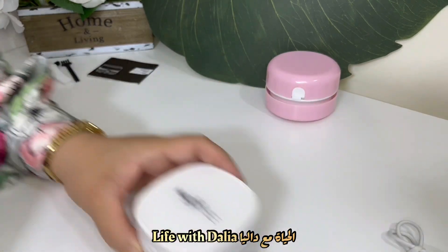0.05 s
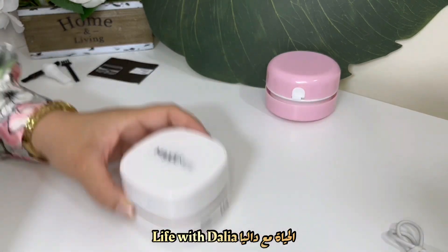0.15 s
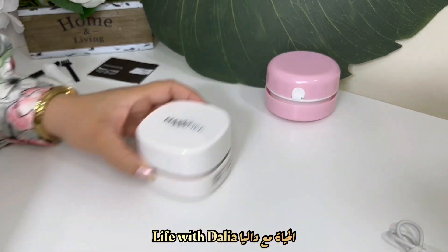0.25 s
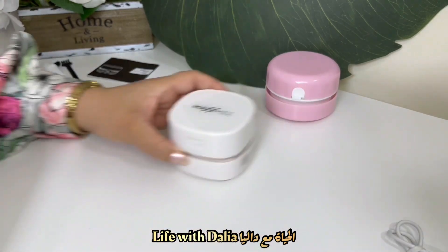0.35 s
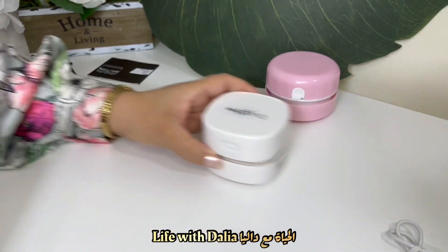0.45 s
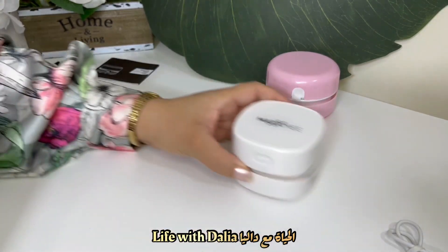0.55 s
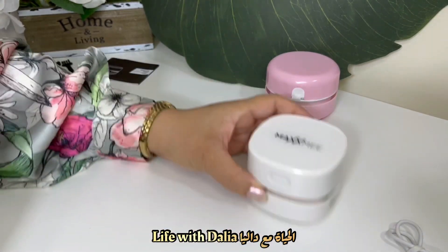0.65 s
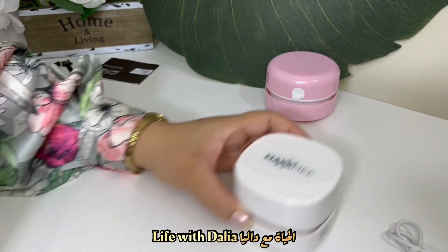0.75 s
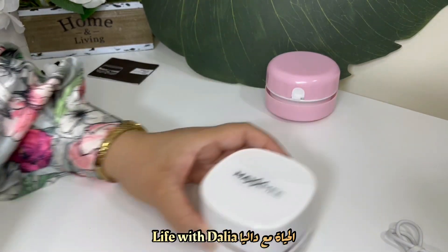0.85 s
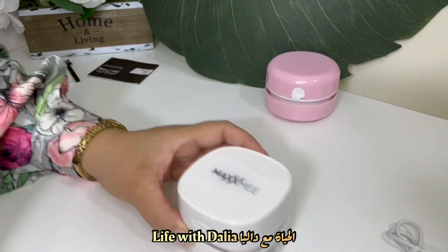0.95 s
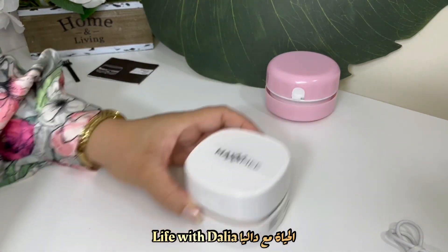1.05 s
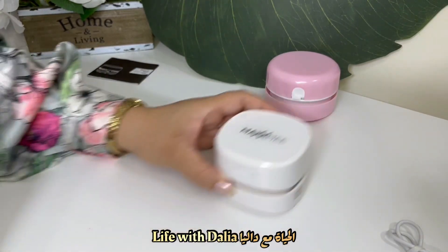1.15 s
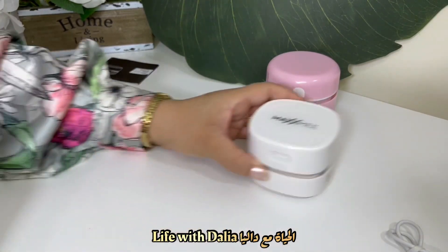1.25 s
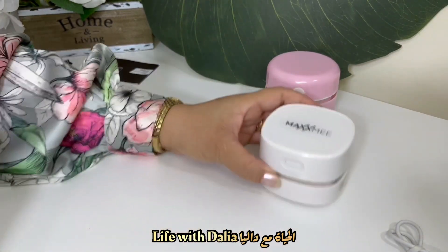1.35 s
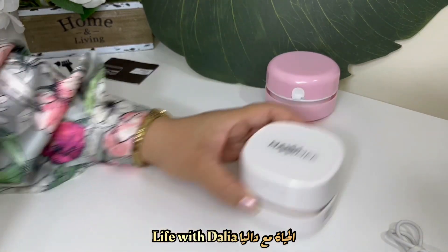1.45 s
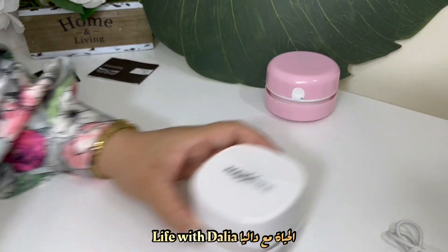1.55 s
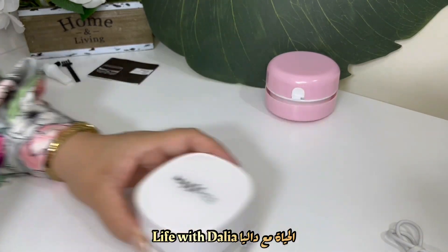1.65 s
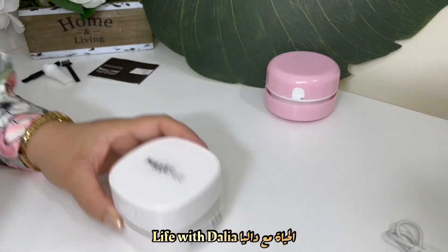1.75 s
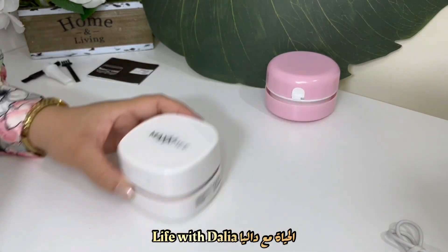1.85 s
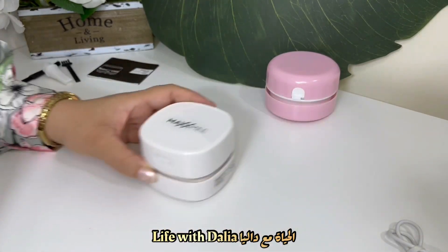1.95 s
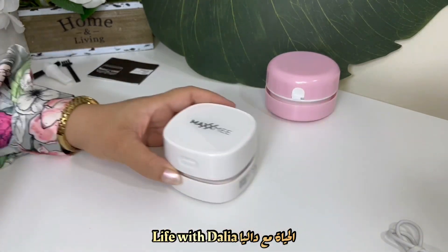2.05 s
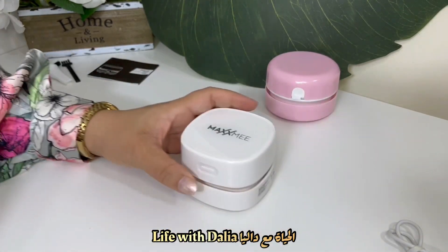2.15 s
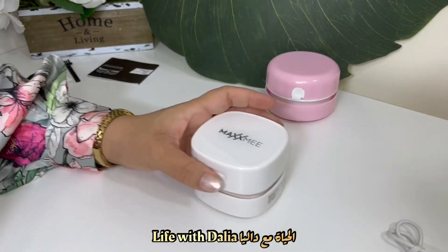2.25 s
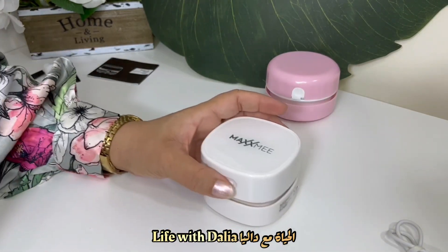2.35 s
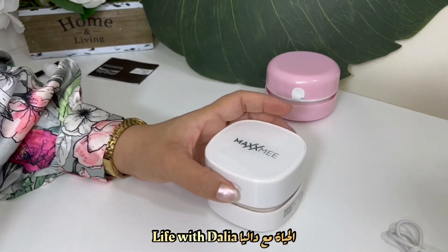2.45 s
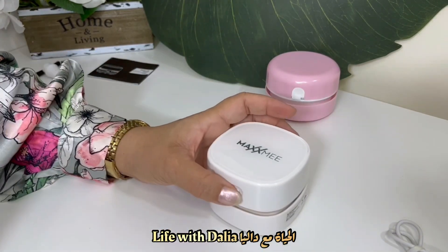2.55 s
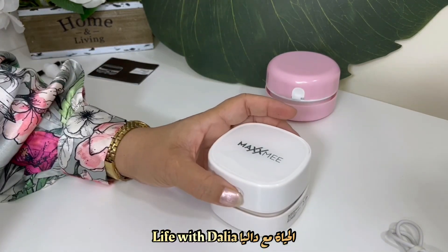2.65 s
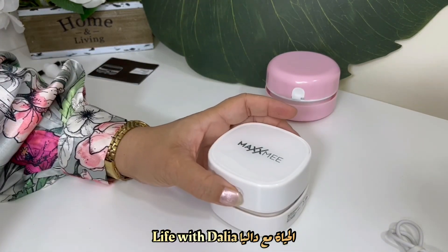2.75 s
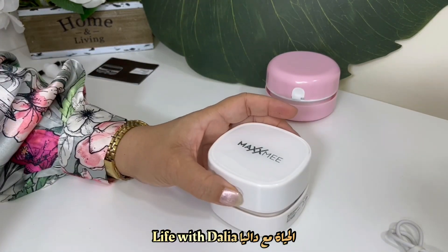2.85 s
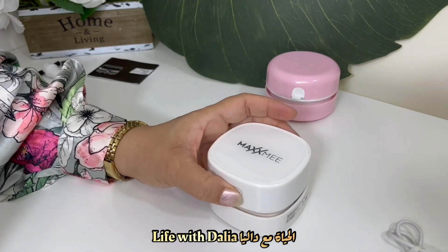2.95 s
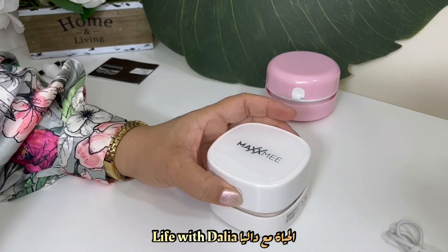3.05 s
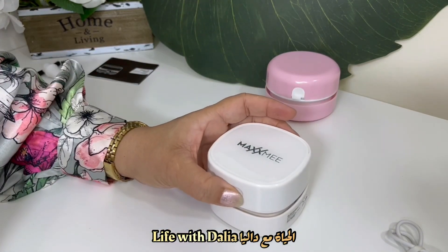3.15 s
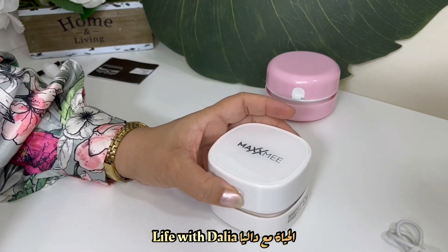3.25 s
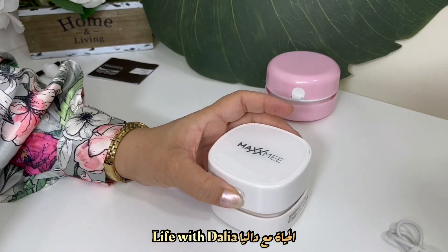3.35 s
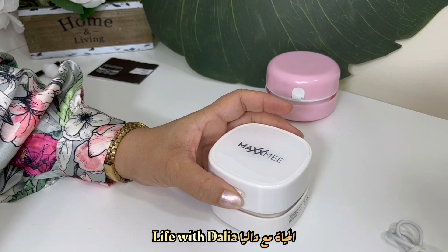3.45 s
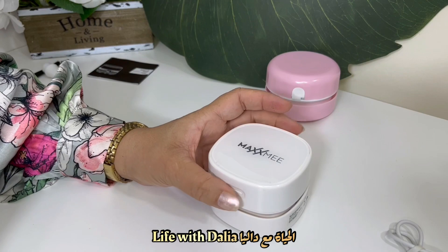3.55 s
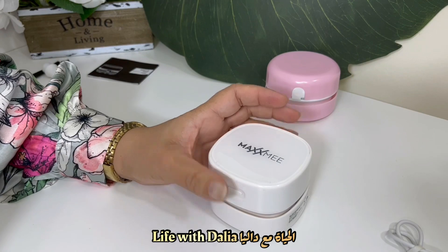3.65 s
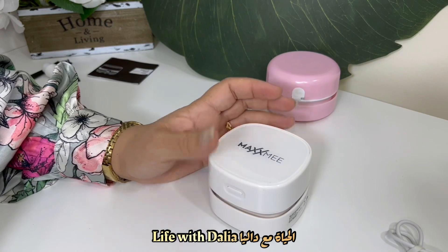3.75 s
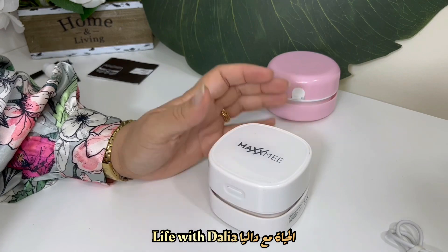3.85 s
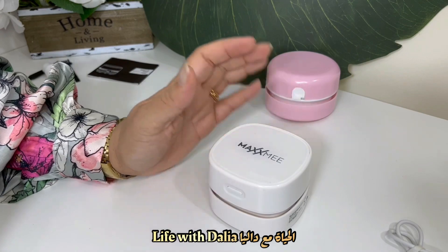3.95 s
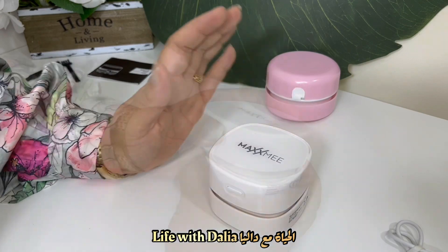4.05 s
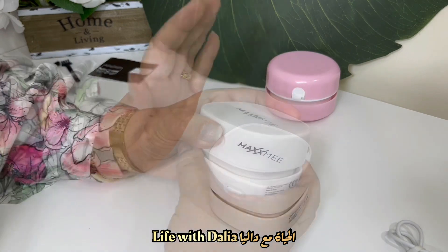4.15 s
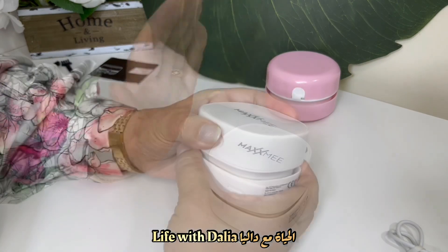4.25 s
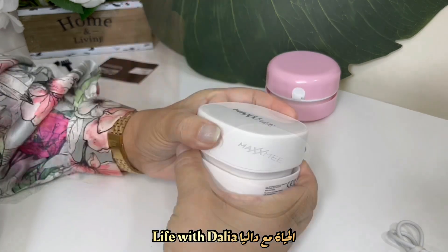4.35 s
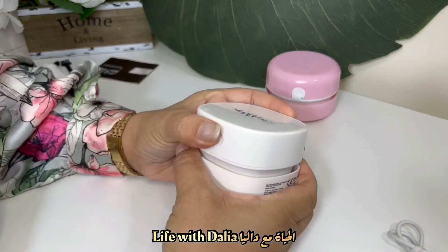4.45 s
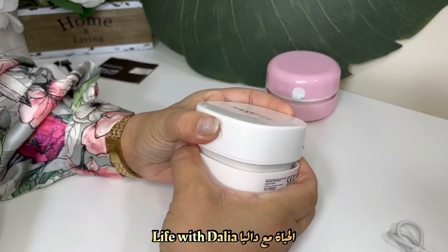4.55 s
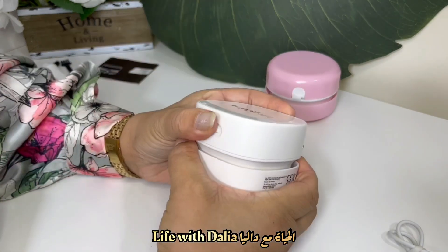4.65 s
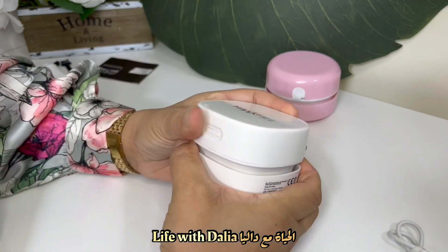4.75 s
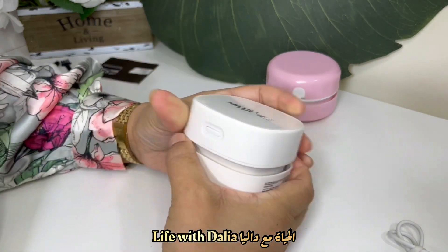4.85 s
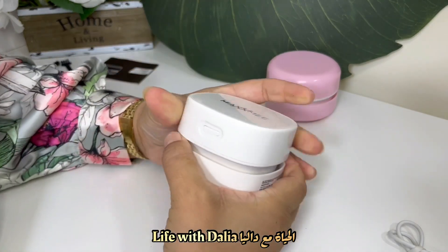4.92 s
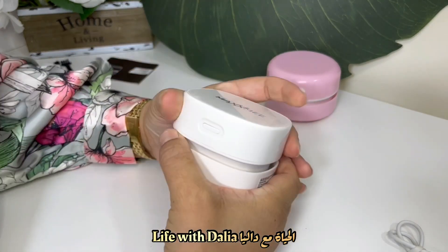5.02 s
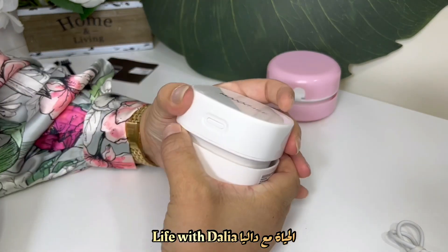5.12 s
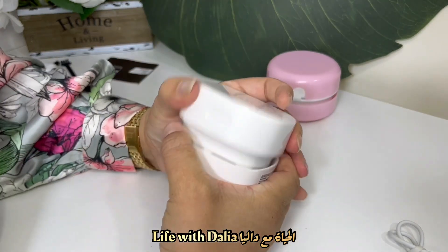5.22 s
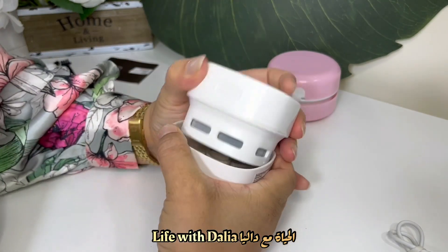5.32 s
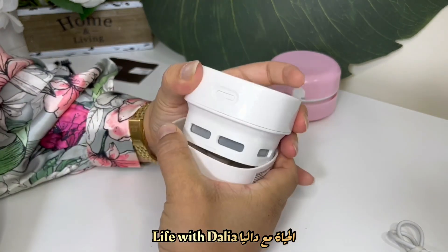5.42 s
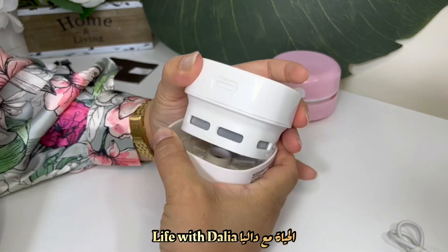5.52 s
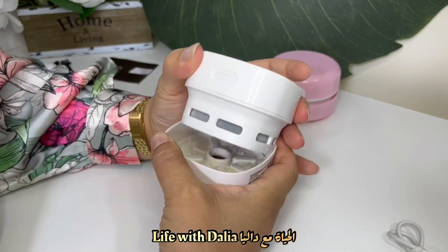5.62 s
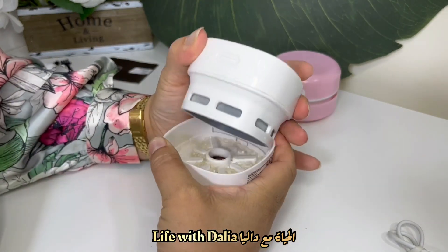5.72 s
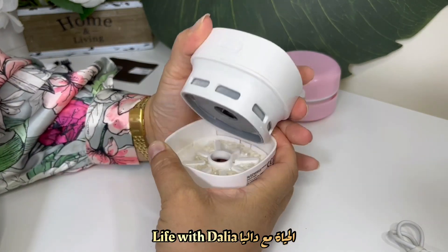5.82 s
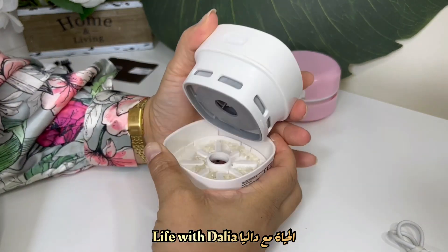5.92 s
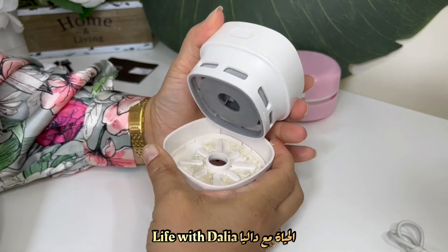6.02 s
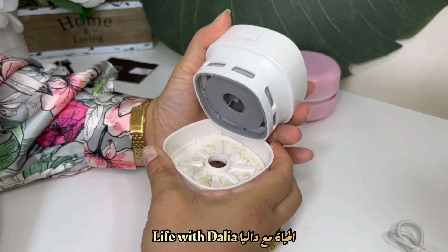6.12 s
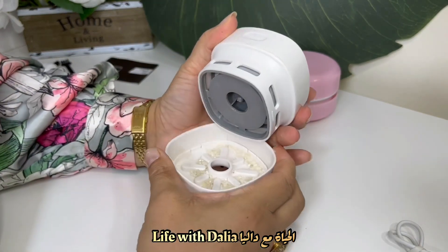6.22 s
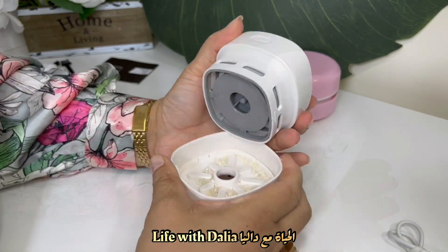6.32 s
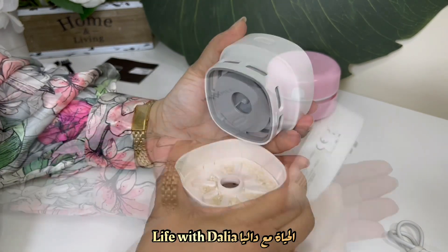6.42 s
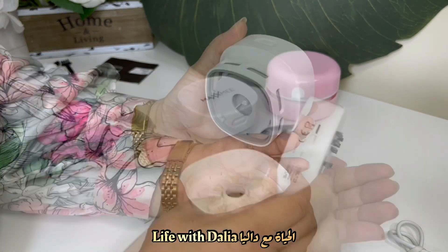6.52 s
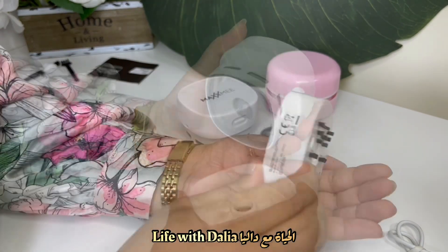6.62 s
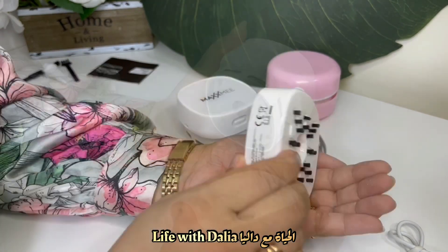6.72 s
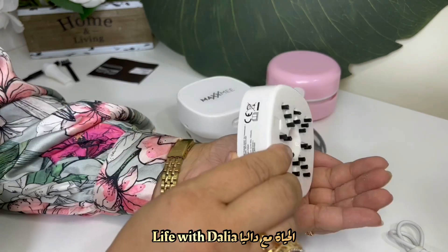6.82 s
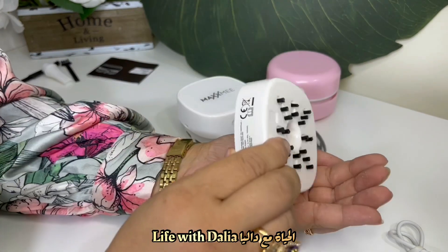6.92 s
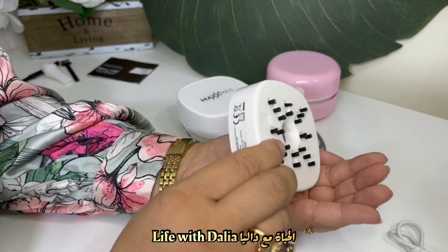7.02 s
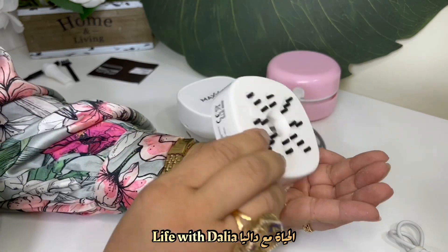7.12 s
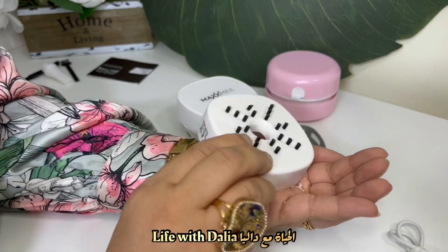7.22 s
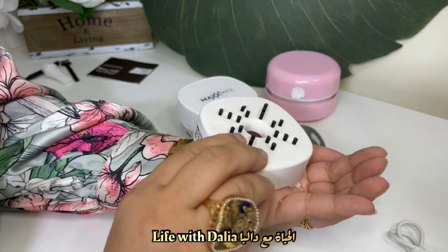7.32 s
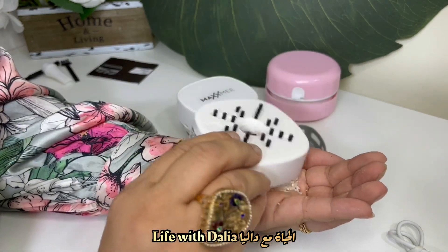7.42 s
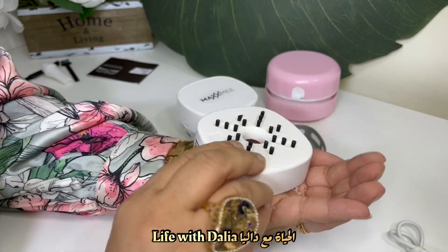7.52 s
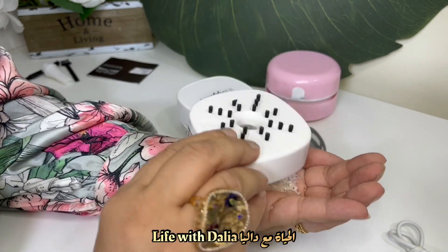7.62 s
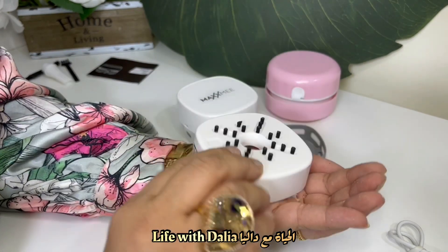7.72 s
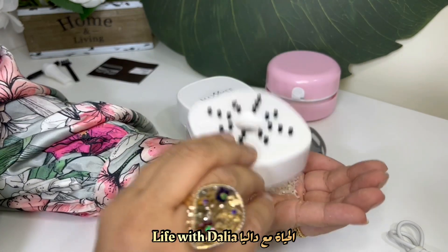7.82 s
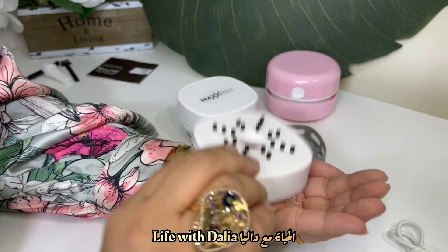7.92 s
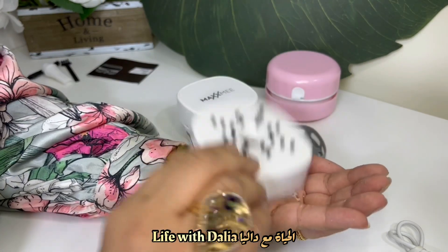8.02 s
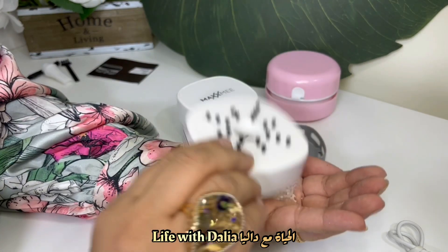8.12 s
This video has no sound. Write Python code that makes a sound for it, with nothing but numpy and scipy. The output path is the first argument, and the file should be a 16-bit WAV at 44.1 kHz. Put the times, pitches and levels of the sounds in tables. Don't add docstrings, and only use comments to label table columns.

```python
import sys
import numpy as np
from scipy import signal
from scipy.fft import rfft, irfft, next_fast_len
from scipy.io import wavfile
from scipy.ndimage import uniform_filter1d

SR = 44100
rng = np.random.default_rng(int(sys.argv[2]) if len(sys.argv) > 2 else 0)


def boost(x):
    u = np.asarray(x, float) / 20
    return 10 ** u


def dump(signal):
    limited = np.clip(np.atleast_2d(signal).T, -1, 1)
    pcm = np.round(limited * 32767).astype(np.int16)
    wavfile.write(sys.argv[1], SR, pcm)


N = 360297


def rms_one(x):
    return x / np.sqrt(np.mean(x ** 2) + 1e-20)


def peak_one(x):
    return x / abs(x).max()


def in_time(rows):
    s, *columns = np.transpose(rows)
    return [np.interp(np.arange(N) / SR, s, c) for c in columns]


def at_hz(points, hz):
    f, *columns = np.transpose(points)
    return [np.interp(np.log(hz + 1), np.log(f), c) for c in columns]


def drift(rate_hz):
    r = np.exp(-40 * np.pi * rate_hz / SR)
    slow = signal.lfilter([1], [1, -2 * r, r * r], rng.standard_normal(N // 20 + 3002))[3000:]
    return np.interp(np.arange(N) / 20, np.arange(len(slow)), rms_one(slow))


def coloured_noise(points):
    size = next_fast_len(N)
    gain = boost(at_hz(points, np.fft.rfftfreq(size, 1 / SR))[0])
    return rms_one(irfft(rfft(rng.standard_normal(size)) * gain, size)[:N])


def band(x, low_hz, high_hz):
    return rms_one(signal.sosfilt(signal.butter(4, [low_hz, high_hz], "band", fs=SR, output="sos"), x))


def ring(hz, t60_s, length):
    t = np.arange(length) / SR
    return np.sin(2 * np.pi * hz * t) * boost(-60 * t / t60_s)


def resonate(x, hz, width_hz):
    r = np.exp(-np.pi * width_hz / SR)
    feedback = [1, -2 * r * np.cos(2 * np.pi * hz / SR), r * r]
    return signal.lfilter([(1 - r * r) / 2, 0, (r * r - 1) / 2], feedback, x)


def resonate_twice(x, hz, width_hz):
    return rms_one(resonate(resonate(x, hz, width_hz), hz, width_hz))


def humps(rows, width_s):
    out, reach = np.zeros(N), round(3 * width_s * SR)
    for s, db in rows:
        near = np.arange(max(round(s * SR) - reach, 0), round(s * SR) + reach)
        out[near] += db * np.exp(-((near / SR - s) / width_s) ** 2)
    return out


# pitch_hz, level_db (per Hz)
MURMUR = [(12, -46.5), (20, -21), (75, -9), (159, -16.5), (200, -28), (285, -24.5), (555, -38),
          (631, -46.5), (2400, -49), (3200, -52.5), (7800, -56.5), (9000, -60.5), (12800, -61.5),
          (14500, -78.5), (19800, -120)]
# pitch_hz, width_hz, level_db
HUM = [(99.15, 1.5, -3), (147, 3.5, -10.5), (118.2, 4.5, -17.5), (62, 9, -15.5), (302, 10, -23.5),
       (583, 1.5, -27), (695, 1.5, -31.5), (737.5, 1.5, -34)]
# start_s, level_db
ROOM_LEVEL = [(0.0, -61.5), (2.05, -65), (3.0, -75), (3.77, -66.5), (4.21, -62.5), (6.1, -60),
              (6.24, -65.5), (6.6, -57.5), (8.17, -60)]


def room_tone():
    white = rng.standard_normal(N)
    hum = sum(boost(db) * resonate_twice(white, hz, width) for hz, width, db in HUM)
    t = np.arange(N) / SR
    shudder_t60_s = 0.62
    shudder = sum((t > s) * boost(db - 20.5 - 60 * abs(t - s) / shudder_t60_s) for s, db, *_ in all_bumps())
    level = boost(in_time(ROOM_LEVEL)[0] - 1.5 + drift(3.0)) + shudder
    return level * np.array([coloured_noise(MURMUR) + hum, boost(-15.5) * coloured_noise(MURMUR)])


# start_s, length_s, level_db, pitch_hz, width_hz
DRAGS = [
    (0, 0.15, -47, 283, 394),
    (1.028, 0.16, -50, 254, 71),
    (5.189, 0.022, -48.5, 474, 400),
    (6.31, 0.083, -68.5, 452, 300),
]
# start_s, length_s,
# bright_db, ringing_db, pitch_hz
SCRAPES = [(3.55, .024, -47, -60, 3500), (3.625, 0.0057, -55, -49, 3500), (3.632, 0.0041, -46, -58, 3600),
           (3.645, 0.0085, -47, -60, 3500), (3.668, 0.0062, -41, -61, 3500),
           (3.702, 0.0042, -46, -47, 3400), (4.476, 0.19, -77, -78, 1900), (4.62, 0.054, -75, -76, 1900),
           (4.687, 0.13, -71, -73.5, 2040), (4.583, 0.057, -87, -68.5, 1180),
           (4.934, 0.055, -98, -79, 1300), (5.189, 0.02, -48, -53, 2400), (5.211, 0.011, -47, -54, 1820),
           (5.23, 0.045, -52, -52.5, 1550), (5.266, 0.0091, -49, -53, 1888), (5.3, 0.019, -55, -68, 1718),
           (5.324, 0.024, -52.5, -43, 1140), (5.367, 0.042, -78, -71, 1500), (5.495, 0.057, -96, -64, 990),
           (5.663, 0.02, -62, -55.5, 1210), (5.692, 0.06, -52, -51, 1580),
           (5.767, 0.061, -52.5, -53.5, 1680), (5.826, 0.071, -66.5, -69, 1294),
           (6.232, 0.18, -58.5, -76, 1010), (6.305, 0.12, -84, -67, 760), (7.395, 0.058, -73, -72.5, 1476)]
# start_s, length_s, bright_db, ringing_db
RUNS = [(6.524, 0.021, -42.5, -56.5), (6.567, 0.03, -41.5, -58), (6.616, 0.014, -44, -53),
        (6.642, 0.034, -55, -64), (6.677, 0.11, -62, -72), (6.75, 0.021, -62, -62), (6.808, 0.13, -97, -72),
        (6.974, 0.07, -75, -75), (7.06, 0.036, -63, -69), (7.123, 0.037, -69, -65),
        (7.226, 0.021, -73, -70), (7.283, 0.022, -83, -71)]


def all_slides():
    drags = [(s, length, -80, db, hz, width) for s, length, db, hz, width in DRAGS]
    scrapes = [(*row, 0.9 * row[-1]) for row in SCRAPES]
    runs = [(*row, 1680, 360) for row in RUNS]
    # pitch_hz, width_hz, ringing_db
    loose_bits = [(1520, 710, -73), (2970, 72, -81), (4670, 260, -83)]
    shakes = [(s, 0.055, -77, db, hz, width) for s, *_ in PALM_TAPS for hz, width, db in loose_bits]
    return drags + scrapes + runs + shakes


# start_s, level_db
HANDLING = [(3.55, -78), (3.83, -80.5), (4.27, -99.5), (4.54, -83), (4.68, -67.5), (4.91, -91), (5.23, -85),
            (5.38, -77), (5.75, -69), (5.93, -97), (6.28, -77), (6.42, -71), (6.55, -85.5), (6.82, -72),
            (7.05, -82), (7.37, -84), (8.17, -78)]
# peak_s, level_db, swell_db_per_s, fade_db_per_s
TRICKLES = [
    (3.55, -50, 904, 251),
    (3.731, -45.5, 57, 400),
    (3.79, -51, 892, 202),
    (5.75, -57, 52.5, 136),
    (6.53, -46, 96.5, 112),
    (6.8, -55, 63, 99),
]
# pitch_hz, level_db (per Hz)
RUB = [(500, -34.5), (1500, -14.5), (2500, -14), (4000, -6.5), (5000, -5), (9000, -10), (13000, -6.5),
       (16000, -5)]
# pitch_hz, level_db (per Hz)
RICE = [(2000, -28), (3200, -14), (4300, -11), (5000, -5), (7000, -2.5), (9000, -3.5), (13000, 1.5),
        (16000, -5.5)]


def rustle():
    skin_db, = in_time(HANDLING)
    white, t = rng.standard_normal(N), np.arange(N) / SR
    rice_falls = (t > 6.2) & (t < 7.35)
    scrape = np.where(rice_falls, coloured_noise(RICE), coloured_noise(RUB))
    rice = sum(boost(db - np.where(t < s, swell * (s - t), fade * (t - s))) for s, db, swell, fade in TRICKLES)
    bright = boost(skin_db - 31) * scrape
    hollow = boost(skin_db - 5.5) * band(white, 1010, 2400)
    dull = boost(-76 + 0.55 * (skin_db - skin_db.mean())) * band(white, 204, 693)
    out = boost(-6.0) * rice * scrape + (bright + hollow + dull) * (t > HANDLING[0][0])
    for s, length, db, ring_db, hz, width in all_slides():
        part = slice(round(s * SR), min(round((s + length + 0.087) * SR), N))
        since = t[part] - s
        rise = np.minimum(since / max(.004, length ** 2), 1)
        fade = boost(-900 * np.maximum(since - length, 0))
        ringing = resonate_twice(white[part], hz, width)
        out[part] += rise * fade * (boost(db) * scrape[part] + boost(ring_db) * ringing)
    return out * boost(3 * drift(150) + 1.2 * drift(25))


# start_s, level_db (peak), pitch_hz, t60_s
BUMPS = [
    (0.028, -29.5, 103.9, 0.029),
    (0.111, -37.5, 147, 0.045),
    (1.12, -43.5, 228, 0.13),
    (2.16, -38, 169.5, 0.09),
    (2.676, -49, 330.6, 0.069),
    (6.737, -35, 103.5, 0.11),
]


def all_bumps():
    return BUMPS + [(s + 0.022, db, 101.7, 0.067) for s, *_, db in PALM_TAPS]


# start_s, level_db (peak), pitch_hz, t60_s
RINGS = [(3.6325, -34, 7550, 0.024), (3.7035, -38, 3260, .025), (5.1942, -36, 2980, .01),
         (5.272, -42, 4700, 0.027), (5.7495, -52, 4970, .02), (7.565, -69, 2930, .12),
         (7.752, -66, 2920, 0.099), (7.754, -48, 930, .05), (7.754, -50, 790, 0.048), (7.07, -74, 925, .08),
         (7.932, -69, 2950, 0.08), (8.109, -66, 2853, 0.16), (8.108, -46.5, 1340, .045)]


def bumps():
    out, t = np.zeros(N + 9000), np.arange(9000) / SR
    for s, db, hz, t60 in all_bumps() + RINGS:
        at = round(s * SR)
        swell = 1 - np.exp(-t / min(0.0031, 2 / hz))
        out[at:at + 9000] += boost(db + 6.5) * ring(hz, max(t60, .005), 9000) * swell
    return out[:N]


# pitch_hz, level_db
PLASTIC = [(2900, -0.5), (3300, -8.5), (4900, -2), (5900, -13.5), (7100, -2.5), (8200, -25), (10200, 2.5),
           (12000, 0.5), (15200, -14.5)]
# pitch_hz, level_db
KNOCK = [(290, -4), (420, 5.5), (620, -5.5), (900, -0.5)]


def detuned_rings(modes, t60_s):
    return sum(boost(db + rng.normal(0, 1.8)) * ring(hz * rng.normal(1, 0.024), t60_s, 4000) for hz, db in modes)


def taps(rows, hollow, t60_s, edge_hz, top_hz=17000):
    out, t = np.zeros(N + 4000), np.arange(4000) / SR
    treble = signal.butter(2, [edge_hz, top_hz], "band", fs=SR, output="sos")
    for s, db, hollow_db, knock_db in rows:
        crack = 0.99 * rng.standard_normal(4000) * (boost(-60 * t / t60_s) + 4.8 * boost(-60 * t / 0.0024))
        walls = detuned_rings(PLASTIC, .7 * t60_s)
        cup = detuned_rings(hollow, 1.8 * t60_s)
        base = detuned_rings(KNOCK, 2.2 * t60_s)
        bright = signal.sosfilt(treble, (walls + crack) * np.minimum(t / 0.00026, 1))
        soft = boost(hollow_db) * peak_one(cup) + boost(knock_db) * peak_one(base)
        at = round(s * SR)
        out[at:at + 4000] += boost(db) * (peak_one(bright) + soft * np.minimum(t / 0.00079, 1))
    return out[:N]


# start_s, level_db (peak), knock_db (re peak)
TOUCHES = [(4.3596, -61, -18), (4.564, -53, -16), (4.631, -50, -5), (4.6445, -49, -1), (4.751, -60, 8),
           (4.94, -56.5, 4), (6.906, -44, -12.5), (7.3938, -55, -8), (7.437, -60, -10), (7.7337, -54.5, 0),
           (8.162, -51.5, -11), (4.481, -68, -20), (4.922, -64, -20), (7.983, -53, -13.5)]
# pitch_hz, level_db
PALM = [(950, 1), (1250, 6), (1450, 10), (1680, 2.5), (2950, -13)]


def finger_touches():
    rows = [(s, db, -6, knock_db) for s, db, knock_db in TOUCHES]
    return taps(rows, PALM, t60_s=0.029, edge_hz=1270, top_hz=7300)


# start_s, pitch_ratio (re usual), ring_db (re click), push_db, thud_db
PALM_TAPS = [
    (7.565, 0.99, -6, -43, -40.5),
    (7.7537, 1.1, -6, -35.5, -48),
    (7.9315, 1.02, 1.5, -34, -42),
    (8.108, 1.01, 4.5, -37, -42),
]


def palm_clicks():
    out = np.zeros(N)
    for s, pitch, ring_db, *_ in PALM_TAPS:
        modes = [(hz * pitch, db) for hz, db in PALM]
        out += taps([(s, -39.5, ring_db, -14)], modes, t60_s=0.032, edge_hz=2300)
    return out


def palm_pushes():
    out, t = np.zeros(N + 4000), np.arange(4000) / SR
    hz = 167.5 + (390 - 167.5) * np.exp(-t / 0.00336)
    push = np.sin(2 * np.pi * np.cumsum(hz) / SR) * boost(-60 * t / 0.0256) * np.minimum(t / 0.0013, 1)
    for s, *_, push_db, _ in PALM_TAPS:
        at = round((s + 0.0015) * SR)
        out[at:at + 4000] += boost(push_db + 6.0) * push
    return out[:N]


# start_s, level_db (peak)
POUR = [(5.294, -34), (6.101, -54), (6.325, -36), (6.335, -30), (6.397, -48), (6.429, -44), (6.483, -27),
        (6.5007, -28), (6.529, -32), (6.535, -29), (6.557, -28), (6.58, -28), (6.59, -30), (6.6004, -22.5),
        (6.6203, -25), (6.6328, -15.5), (6.6524, -19), (6.691, -20), (6.7247, -20.5), (6.741, -35),
        (6.8211, -48), (6.7645, -23), (6.777, -33), (7.06, -56), (7.0748, -33.5), (7.09, -40)]
# pitch_hz, level_db
TRAY = [(1650, -13), (1780, 18)]


def poured_grains():
    return taps([(*row, -28, -39) for row in POUR], TRAY, t60_s=0.018, edge_hz=5350)


# pitch_hz, level_db
HOLLOW = [(1050, 12), (1400, 17), (1750, 17), (2200, -13)]
# start_s, level_db (peak), hollow_db (re peak), knock_db (re peak)
TWIST = [(5.1946, -30.5, -26, -8), (5.207, -25, -24, -12), (5.277, -28, -2, -12), (5.3276, -33.5, 6, -6.5),
         (5.6318, -38, -30, -33), (5.662, -41, -19.5, -31), (5.6842, -15, -8, -36),
         (5.6952, -6, -10.5, -37), (5.7032, -28.5, -1, -27), (5.7297, -33, 2, -29.5),
         (5.7494, -39, -17, -16), (5.7672, -34.5, -16, -5.5), (5.7712, -41.5, -25, -28),
         (5.7782, -36, -20, -29), (5.7822, -17, -4.5, -27), (5.788, -16.5, -8, -23), (5.7953, -35, 9, -13),
         (5.8554, -41, -5, -1)]


def snapping_catches():
    return taps(TWIST, HOLLOW, t60_s=0.015, edge_hz=1450)


# start_s, level_db (peak), hollow_db (re peak)
LAST_GRAINS = [(3.442, -19, -42), (3.47, -13, -42), (3.499, -13.5, -51), (3.53, -24, -31),
               (3.593, -23, -32), (3.6233, -23.5, -39), (3.6341, -20, -42), (3.66, -20, -40),
               (3.683, -25, -25), (3.7048, -26, -17.5), (3.711, -32, -37), (3.731, -29, -38),
               (3.763, -37, -38), (3.782, -22, -40.5)]


def last_grains():
    return taps([(*row, -42) for row in LAST_GRAINS], HOLLOW, t60_s=0.037, edge_hz=4000)


# pitch_hz, level_db (per Hz)
BEARING = [(400, -22), (720, -7), (830, 7), (960, -4), (1400, -8), (2500, -21), (6000, -18), (9000, -30)]


def rotor():
    t = np.arange(N) / SR
    power_cut_s, full_turns_per_s, brake_turns_per_s2 = 3.389, 32.9, 22
    per_s = np.maximum(full_turns_per_s - brake_turns_per_s2 * np.maximum(t - power_cut_s, 0), 1)
    speed = per_s / full_turns_per_s
    hz = 285 + 0.48 * per_s
    stall = boost(-50 * np.maximum(t - 4.11, 0))
    heard = np.clip((t - 3.22) / 0.22, 0, 1) ** 2 * stall
    turn = (np.cumsum(per_s) / SR - power_cut_s * full_turns_per_s) % 1
    since = turn / per_s
    swell = (since / 0.0053) * np.exp(1 - since / 0.0052)
    low_part = 2.5 * (1 - speed) * np.sin(1.56 * np.pi * hz * since)
    throb = swell * (np.sin(2 * np.pi * hz * since) + low_part)
    throb *= speed ** 1.5 * boost(-50 + 1.3 * drift(30))
    hiss = boost(-59.5) * speed ** 2.34 * (0.7 + 0.21 * swell) * coloured_noise(BEARING)
    return heard * (throb + hiss)


# start_s, level_db (peak)
STRAYS = [(0.2895, -8.5), (0.45, -6), (0.6436, -5.5), (0.788, -5.5), (0.8664, -7.5), (0.909, -7.5),
          (1.031, -10.5), (1.0689, -7.5), (1.0963, -7.0), (1.2357, -15), (1.4695, -12.5), (1.7924, -12.5),
          (1.8122, -11.0), (1.8446, -9), (1.909, -9), (2.6728, -4), (3.0525, -14.5), (3.1705, -19.5),
          (3.214, -25), (3.2969, -12), (3.3262, -15), (3.4082, -16.5)]


def stray_grains():
    return taps([(s, db - 1.5, -30, -45) for s, db in STRAYS], HOLLOW, t60_s=0.018, edge_hz=7900)


# pitch_hz, width_hz, level_db
SHELL = [(1130, 93, -15.5), (1292, 91, -19), (1852, 110, -16.5), (2776, 130, -10.5), (3688, 110, -3.5),
         (4030, 200, 0.5), (4208, 180, -5), (5093, 130, 1), (5524, 150, -2.5), (6210, 180, -4),
         (6643, 390, -3.5), (7310, 530, -4.5), (9845, 210, -1.5), (11000, 870, -7.5), (15720, 310, -8.5)]
# middle_s, half_width_s, pitch_hz, level_db
SWELLS = [(0.207, 0.065, 4200, -1), (.05, 0.088, 4100, 2.5), (0.69, 0.046, 5100, 6), (0.76, .14, 3800, 5),
          (0.67, 0.15, 4250, 8.5), (1.1, .1, 7100, 3.5), (0.062, .1, 4900, 3), (0.23, 0.066, 4000, -4.5),
          (0.57, .05, 3400, 0.5), (2, 0.077, 3800, 2.5), (1.6, 0.048, 3200, 4), (2.25, .25, 4250, 5),
          (1.8, .12, 4100, -3), (2, .12, 8000, 0.5), (3.5, .15, 5700, 2.5), (2.05, 0.38, 7800, 1),
          (0.48, 0.2, 1150, 4.5), (1.08, 0.12, 710, 7), (.1, .06, 5100, 8), (1.6, 0.084, 4300, 6.5),
          (1.1, .08, 5100, -9.5), (2.05, .12, 5100, -5), (2.35, 0.066, 5200, 2.5), (2.9, .3, 5050, -3.5),
          (2.4, .6, 3650, -3), (2.75, 0.22, 4100, 2.5), (2.9, .3, 2900, 1), (2.3, .25, 7800, -3.5),
          (2.55, .15, 8100, 2.5), (.8, .1, 15600, 9.5), (1.55, .12, 15600, 6.5), (1.1, .1, 15600, -6.5),
          (2.7, 0.47, 1130, -1), (3.4, 0.17, 1800, 2.5)]


def shell_rattle(hits_per_s, clump_db):
    hits = np.flatnonzero(rng.random(N) < hits_per_s * boost(clump_db) / SR)
    sizes = boost(2.67 * np.minimum(rng.exponential(1, len(hits)), 4.1))
    rattle = np.zeros(N)
    for hz, width, db in SHELL:
        clicks = np.full(N, 1e-18)
        clicks[hits] = sizes * rng.standard_normal(len(hits))
        modes_db = np.zeros(N)
        for s, half, f, swell_db in SWELLS:
            if abs(hz / f - 1) < .15:
                modes_db += humps([(s, swell_db)], half) * np.exp(-(np.log(hz / f) / 0.067) ** 2)
        wander_db = 1.1 * drift(7.02)
        rattle += boost(db + modes_db + wander_db) * resonate(clicks, hz, width)
    return rms_one(rattle / np.sqrt(hits_per_s))


# start_s, level_db, grip (0 loose, 1 full, up to 1.2; how firmly the hand damps the shell)
WHIRL = [(0.0, -22, 0.24), (0.42, -23.5, 0.16), (0.65, -22, 0.16), (0.91, -25, 0.27), (1.1, -24, 0.01),
         (1.42, -24, 0.16), (1.8, -25.5, 0.55), (2.3, -22.5, 0.51), (2.905, -25, 0.67), (2.93, -30.5, 0.85),
         (3.09, -30.5, 0.9), (3.27, -31.5, 0.76), (3.44, -35, 1.1), (3.502, -37, 1.2), (3.512, -43, 1.1),
         (3.575, -43.5, 1.1), (3.59, -52, 0.9), (3.62, -50, 1)]
# start_s, hits_per_s
HITS_PER_S = [
    (0, 2654),
    (2.8, 2464),
    (3.1, 1200),
    (3.62, 720),
]
# pitch_hz, level_db (per Hz)
HISS = [(300, -20), (600, -16), (820, -21), (2300, -28.5), (2600, -15), (3000, -7), (4500, -19),
        (7500, -4.5), (8400, -15.5), (10000, -2), (12500, -5.5), (13200, -11), (16000, -7.5)]
# low_hz, high_hz, level_db (loose), grip_db (change at full grip),
# resists (share of the level swing it resists)
SHELL_PARTS = [(710.7, 1500, -17, -7.5, 0.1), (1500, 2100, -23, 2, 0.22), (3500, 4554, -3, -7.5, 0.32),
               (10220, 15040, -15, 11, .05)]
# middle_s, level_db (above the whirl)
CLUMPS = [(0.016, 5), (0.109, 4.5), (0.224, 3.5), (0.289, 5), (0.425, 1.1), (0.454, 4), (0.604, -1.5),
          (0.641, -0.5), (0.992, 6.5), (1.069, 1), (1.183, 3), (1.291, 3), (1.365, 2.5), (1.472, 0.5),
          (1.508, 2), (1.54, -0.5), (1.632, 0.5), (1.701, 2), (1.908, 2.5), (1.945, 1.5), (1.998, -2.2),
          (2.133, 2), (2.209, 3.5), (2.313, 2), (2.357, 5.5), (2.441, 2), (2.59, 3.5), (2.673, 5),
          (2.773, 3.5), (2.833, 1.5), (2.877, -4), (3.053, 5.5), (3.196, 5.5), (3.218, 5), (3.243, 3.5),
          (3.316, 2.5), (3.408, 3), (3.443, 5.5), (3.473, 0.5), (3.497, 3)]
# middle_s, level_db (re the whirl)
LULLS = [(0.154, -0.5), (0.486, -2.5), (1.049, -2), (1.228, -7), (1.252, -5.5), (1.337, -4.5),
         (1.431, -4.5), (1.599, -3), (1.779, -5), (1.861, -3.5), (1.889, -0.5), (2.046, -3), (2.421, -1.5),
         (2.637, -3.5), (2.727, -2.5), (2.924, -2), (3.161, -8), (3.384, -0.5)]


def whirl():
    treble_db, grip = in_time(WHIRL)
    clump_db = 1.39 * (.3 * drift(11) + .8 * drift(60))
    both = shell_rattle(in_time(HITS_PER_S)[0], clump_db) + boost(clump_db) * coloured_noise(HISS)
    sound = boost(3.5) * band(both, 4930, 17500)
    sound += boost(-13.0) * band(both, 2348, 3293)
    sound += boost(-36.5) * band(both, 150, 490)
    for low, high, db, grip_db, resists in SHELL_PARTS:
        sound += boost(db + grip_db * grip + resists * (-23 - treble_db)) * band(both, low, high)
    running = np.arange(N) < WHIRL[-1][0] * SR
    bunching_db = 0.93 * humps(CLUMPS, 0.0063) + 1.03 * humps(LULLS, 0.0099)
    return running * boost(treble_db + bunching_db) * sound


# pitch_hz, reflected_db, left_minus_right_db, right_leads_rad
PORTS = [(60.47, -22.5, -2.5, 0.1), (200, -13, 0.5, 0.24), (498.5, -5, 1.5, -0.33), (1040, -9, 0, 0.77),
         (2177, -3, 3.5, -0.85), (2760, -4.5, 2, -1), (4050, -4, 3, -1.01), (4830, -5, 5.5, -1.56),
         (6600, 1, 2, 0.085), (7600, 2.5, 2.5, 0.2), (8040, -16, 0, 0.028)]


def ports(x):
    size = next_fast_len(N + 8000)
    hz = np.fft.rfftfreq(size, 1 / SR)
    wet_db, pan_db, lead = at_hz(PORTS, hz)
    turn = 2 * np.pi * np.maximum(hz - 8542, 0) / 3453
    lead = lead + turn - 0.011 * np.sin(2 * turn)
    tails = rng.standard_normal((2, 2, 8000)) * boost(-60 * np.arange(8000) / SR / 0.048)
    tails = rfft(tails / np.sqrt(np.sum(tails ** 2, axis=2, keepdims=True)), size)
    tails = tails / np.sqrt(uniform_filter1d(abs(tails) ** 2, size=1500))
    place = 2.2 * drift(2.72)
    wet = tails[0] * rfft(x * np.cos(place), size) + tails[1] * rfft(x * np.sin(place), size)
    side = np.array([[-.5], [.5]])
    direct = np.exp(1j * side * lead) * rfft(x, size)
    both = (direct + boost(wet_db) * wet) / np.sqrt(1 + boost(wet_db) ** 2)
    return irfft(both * boost(-side * pan_db), size)[:, :N]


def scene():
    room, diffuse = room_tone()
    hands = rustle() + bumps() + finger_touches() + palm_clicks() + palm_pushes()
    grains = poured_grains() + last_grains() + stray_grains()
    machine = snapping_catches() + rotor() + whirl()
    return ports(room + hands + grains + machine) + diffuse * [[1], [-1]]


# pitch_hz, gap_db
DROP_GAP = [(300, 18), (1000, 14), (2300, 9), (3000, 11), (7600, 14), (8000, 6.1), (16000, 3)]


def joint_stereo(x):
    hz, _, z = signal.stft([x[0] + x[1], x[0] - x[1]], SR, nperseg=2048, noverlap=1024)
    power = np.add.reduceat(abs(z) ** 2, np.arange(0, 1025, 16), axis=1) + 1e-20
    wavering_db = uniform_filter1d(rng.normal(0, 6, power[0].shape), size=3, axis=1)
    gap_db = 10 * np.log10(power[0] / power[1]) + wavering_db
    limit_db = at_hz(DROP_GAP, hz[::16, None])[0]
    z = z * np.repeat([gap_db > -limit_db, gap_db < limit_db], 16, axis=1)[:, :1025]
    mid, side = signal.istft(z, SR, nperseg=2048, noverlap=1024)[1][:, :N]
    return np.array([mid + side, mid - side]) / 2


def top_cut(x):
    return signal.sosfilt(signal.butter(12, 17130, fs=SR, output="sos"), x)


def record(dry):
    cut = signal.sosfilt(signal.butter(2, 39.54, "high", fs=SR, output="sos"), dry)
    cut = signal.sosfilt(signal.ellip(12, .5, 70, 15850, fs=SR, output="sos"), cut)
    return top_cut(joint_stereo(cut))


dry = scene()
out = record(dry)
dump(out)
```